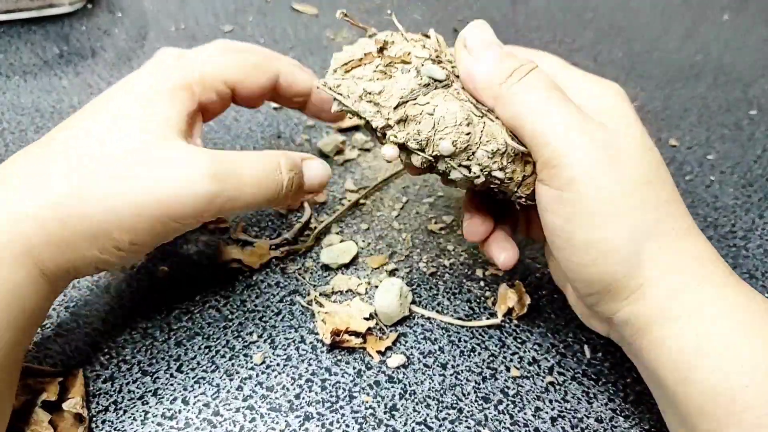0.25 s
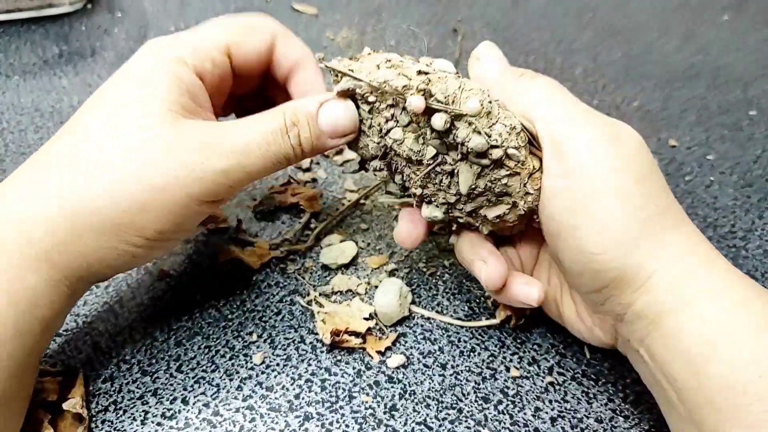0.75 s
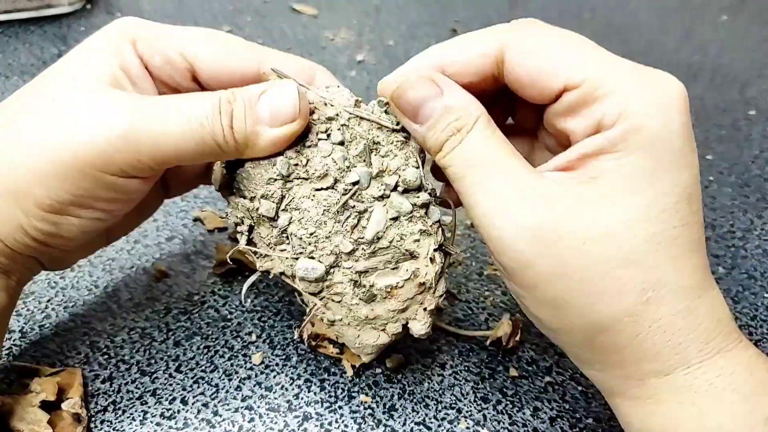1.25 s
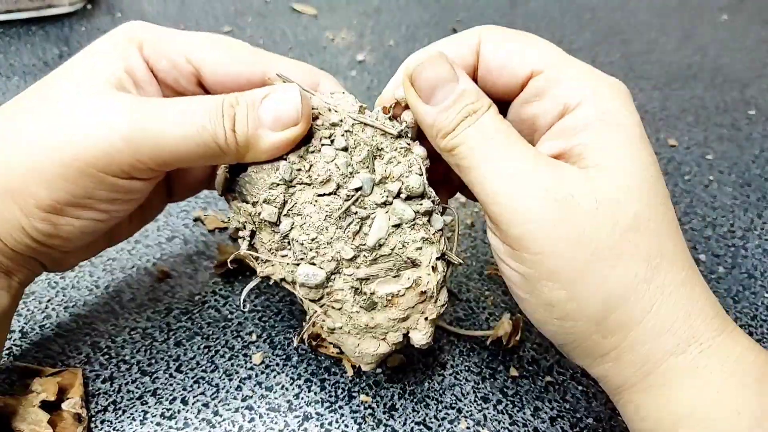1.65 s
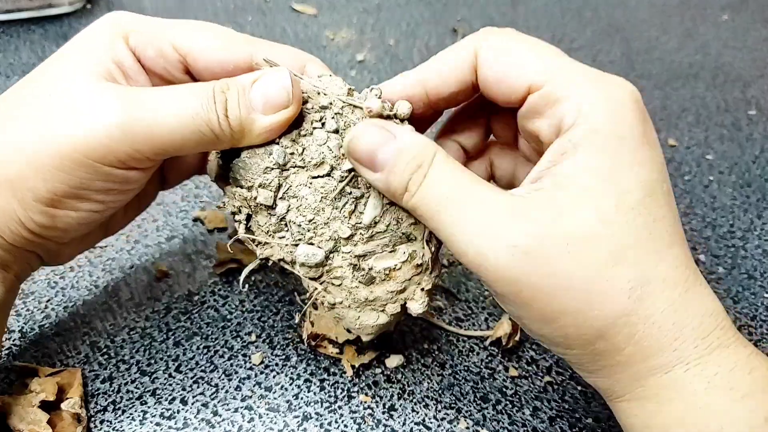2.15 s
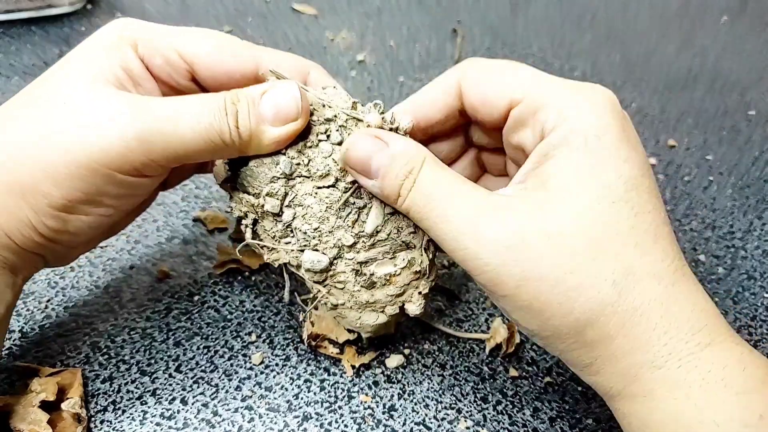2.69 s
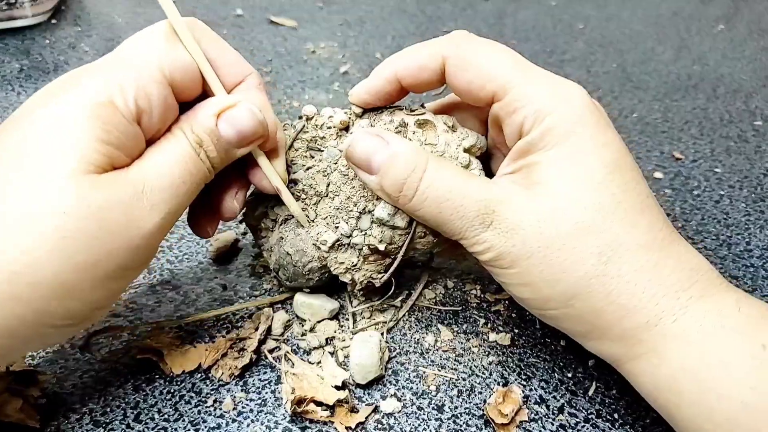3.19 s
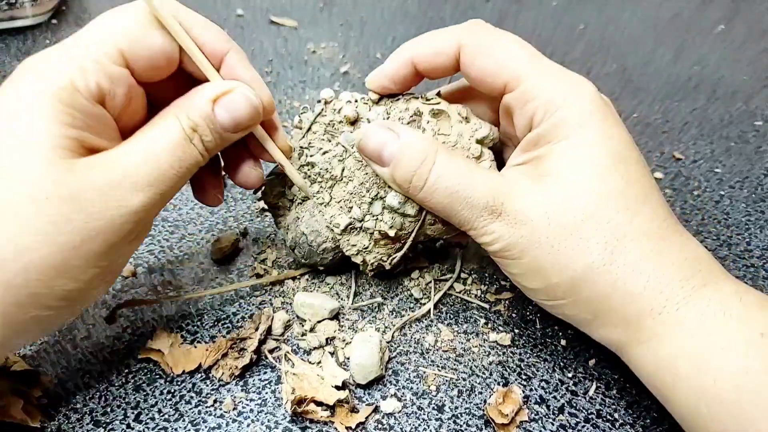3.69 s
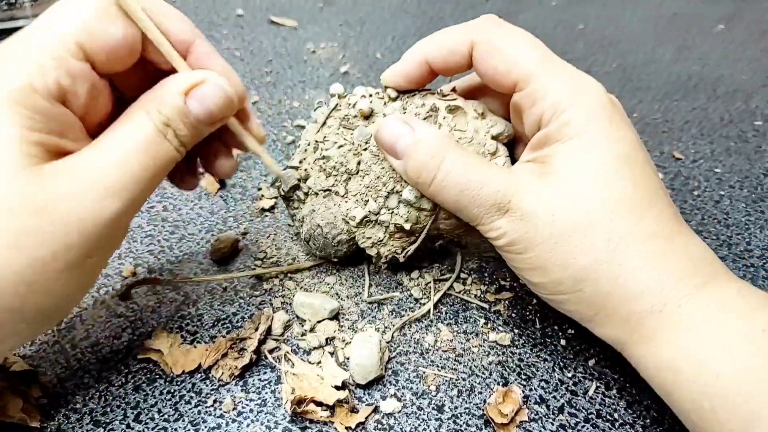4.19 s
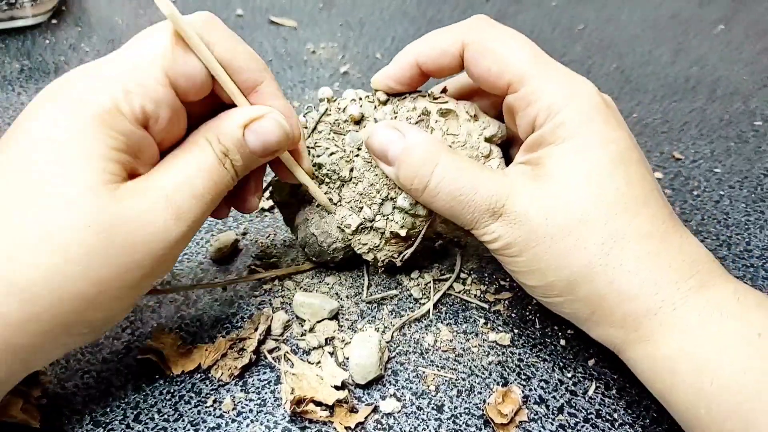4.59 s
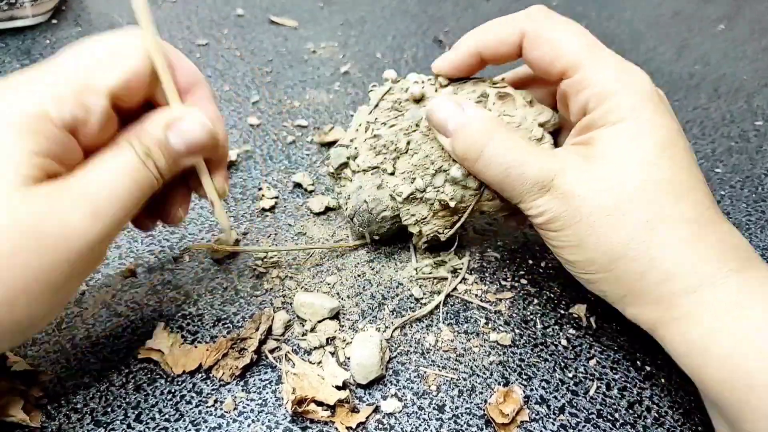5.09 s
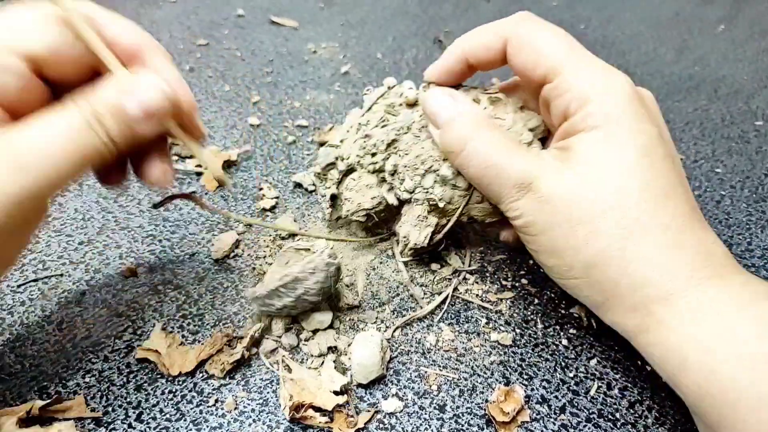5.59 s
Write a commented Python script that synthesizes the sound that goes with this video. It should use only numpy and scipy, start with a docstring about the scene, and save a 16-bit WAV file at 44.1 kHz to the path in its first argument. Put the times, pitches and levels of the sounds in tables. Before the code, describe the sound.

Fingers rub and pick at a dry mud lump, giving soft gritty crackles for about a second, then near quiet. A sharp snap at 2.5 seconds sheds crumbs; a stick then digs in with increasingly loud cracks, crumb sprays and hollow table thumps. Close stereo microphone in a small dry room, brighter on the right, faint low room noise.

```python
"""Dried mud breaks off a lump under fingers and a thin stick, over a light table, near a two-port microphone.
The crust cracks as bursts of noise with a dull knock; hard chips snap as short tones, and a nail scrapes.
Crumbs rub and trickle as dense random puffs; pushes and landings ring the low modes of the table.
The right port faces the work and is strongest near 7 kHz. Room tone lies beneath.
The level dips briefly four times, and one sharp click sounds alike in both channels."""
import sys
import numpy as np
from scipy import signal
from scipy.fft import rfft, irfft, next_fast_len
from scipy.io import wavfile
from scipy.ndimage import uniform_filter1d

SR = 44100
rng = np.random.default_rng(int(sys.argv[2]) if len(sys.argv) > 2 else 0)


def rack_gain(trim_db):
    """Turn a fader trim in dB into the linear factor to multiply a signal by."""
    fader = np.asarray(trim_db, float)
    return 10 ** (fader / 20)


def pcm_store(signal):
    """Save signal as 16-bit PCM."""
    levels = np.round(np.clip(np.atleast_2d(signal), -1, 1) * 32767)
    wavfile.write(sys.argv[1], SR, levels.astype(np.int16).T)


N = 257984
T = np.arange(N) / SR

# Steady room noise. Each row: frequency in Hz, relative power density in dB per Hz.
ROOM_TONE_SPECTRUM = [(25, -32), (50, -22.5), (80, -5.5), (120, -5), (290, -5.5), (500, -13), (1100, -20),
                      (6500, -31.5), (7800, -40), (10700, -38), (11400, -35.5), (12100, -34.5),
                      (15300, -34), (16000, -44)]
ROOM_TONE_DB = -57  # rms

# Faint rustle of the lump held still: fine crumbs in dB, coarse crumbs in dB, patter on the table in dB.
HOLDING_LEVELS = (-75, -69.5, -70)
# Fingers or stick rub the crust. Each row: middle in seconds, time from the middle to 1/e in seconds,
# fine crumbs in dB, coarse crumbs in dB, patter on the table in dB.
RUB_EVENTS = [(0.075, 0.066, -49, -54.5, -70), (0.202, 0.062, -51.5, -75, -72),
              (0.33, 0.087, -58, -77, -77), (0.524, 0.016, -71, -54, -68), (0.636, 0.071, -51, -54.5, -72),
              (0.797, 0.25, -53.5, -57.5, -68), (1.025, 0.0092, -54, -68, -74),
              (1.181, 0.047, -56, -74, -63), (2.286, 0.033, -49, -64, -73), (2.436, 0.14, -60.5, -77, -85),
              (2.745, 0.034, -58, -47.5, -76), (2.891, 0.028, -55, -55.5, -69),
              (2.982, 0.025, -61, -60, -53), (3.2, 0.054, -50.5, -51, -47), (3.533, 0.12, -49, -45, -48.5),
              (3.675, 0.023, -52, -45, -40), (4.161, 0.057, -51.5, -40, -46.5),
              (4.402, 0.011, -60, -70, -42), (4.705, 0.11, -55.5, -51.5, -44),
              (4.847, 0.04, -55.5, -52.5, -45), (4.986, 0.012, -55.5, -59, -46),
              (5.352, 0.022, -53, -47, -41.5), (5.447, 0.032, -58.5, -58, -48)]
# Crumbs shed after a break. Each row: start in seconds, t60 in seconds, fine crumbs in dB,
# coarse crumbs in dB, patter on the table in dB; the levels come before the rise.
SPRAY_EVENTS = [(2.527, 0.51, -43.5, -35, -52.5), (3.333, 0.89, -36, -32, -42.5),
                (3.969, 0.33, -47.5, -41, -34.5), (4.06, 0.38, -39.5, -55, -28.5),
                (5.056, 0.71, -35, -31.5, -33.5), (5.168, 0.2, -67, -59, -51),
                (5.493, 0.47, -25.5, -23.5, -25), (5.73, 0.63, -60.5, -43.5, -33)]
SPRAY_RISE_S = 0.02
CROWDING, BUSY_DB = 0.8, -51.5  # dB of crumb rate per dB of level; level at which the rate is nominal

# Modes of the table. Each row: frequency in Hz, relative level in dB, t60 in seconds.
TABLE_MODES = [(130.2, -1, 0.24), (188, 0.5, 0.16), (251, -18, 0.45), (287.8, 0.5, 0.33), (350, -13, 0.113),
               (416.4, 2, 0.15), (444.3, 3.5, 0.11), (564, -3, 0.094), (709, -14.5, 0.1),
               (915, -14.5, 0.082)]
# Single blows on the table. Each row: start in seconds, level in dB before the wobble,
# mean gain of the deep modes in dB, mean gain of the middle modes in dB.
THUMP_EVENTS = [(0.072, -47, -18, -12), (0.416, -55, -3, -4), (0.517, -54, -1, -19),
                (0.545, -51.5, -17, -1.5), (2.526, -38, -37, -0.5), (3.076, -46.5, -6, -0.5),
                (3.15, -43, -4.5, 1), (3.325, -30, 1.5, -8.5), (3.401, -35.5, -38, -27),
                (3.967, -44, 0, -4), (4.06, -23.5, 3, 1.5), (4.09, -35, -5, 3), (4.095, -31, 16.5, 0),
                (4.128, -47, 22, 7.5), (4.391, -49.5, 9.5, -11.5), (4.549, -50.5, 9, 4.5),
                (4.67, -39.5, -7, 5.5), (4.836, -35.5, -38, -12), (5.045, -29.5, 7, 7.5),
                (5.085, -34, -14, 8.5), (5.168, -27, -16, 3), (5.232, -45.5, -18, 3.5),
                (5.342, -54, -11, 14), (5.5, -29, 4.5, 4), (5.526, -20, -5.5, -14.5), (5.545, -32.5, -6, 5),
                (5.567, -34, 2, -2), (5.593, -49, 10, -4), (5.662, -37, -27, 5.5), (5.725, -12.5, -2, -11),
                (5.757, -27.5, -3, -11)]
WOBBLE_S = 0.0113  # spacing of the random points that the level of a ring wobbles through
# The microphone's bass roll-off. Each row: frequency in Hz, gain in dB.
BASS_ROLL_OFF = [(20, -30), (45, -15), (70, 3), (110, -1)]

# Breaks of the crust. Each row: start in seconds, level in dB, knock before a common lift in dB,
# treble over body in dB, left over right level of the burst in dB.
CRACK_EVENTS = [(0.034, -31.5, -23, -12, -22), (0.05, -49, 7, 16.5, -6), (0.0749, -51.5, 13, 10, -6),
                (0.1459, -35, -27, -9, -14), (0.163, -52, -11, 7, -1), (0.183, -52.5, -12, 9, 6),
                (0.1987, -34, -10, 9.5, -12.5), (0.2332, -28.5, -28, -10, -10.5),
                (0.305, -34.5, -13, -3, -14), (0.332, -42.5, -6.5, 6.5, -1), (0.338, -28.5, -22, -7, -18),
                (0.366, -52, -17, 15.5, -11), (0.418, -41, -2.5, -5, -1), (0.467, -52.5, 3, 1.5, 2.5),
                (0.518, -59, -17, -25, 2), (0.5432, -50, -13, -29, 7.5), (0.6492, -39, -25, -8, -11),
                (0.703, -46, -11, -18, 4), (0.76, -47.5, -14, 4.5, 0), (0.793, -49, -16, 16, -13),
                (0.882, -45, -37, 15.5, -6.5), (0.914, -37.5, -3, 1.5, 2), (1.02, -42, -10, -22, -9),
                (1.1538, -53, -12, 14.5, 1), (1.2738, -50.5, 8.5, -8, 2), (1.9001, -49.5, -6, 3.5, -1.5),
                (2.29, -40.5, -22, -3.5, 6), (2.433, -46.5, -12, 1.5, -1), (2.478, -53, -22, 13.5, 2.5),
                (2.528, -15.5, -16.5, -5, 0.5), (2.5915, -39, -16, -31, 9.5), (2.6062, -33.5, 0, -28, 6),
                (2.6718, -37, -19, -20, 6.5), (2.693, -49.5, 4, -33, 11.5), (2.7194, -29, -27, -34, 0.5),
                (2.7411, -43, -11, -27, 7.5), (2.788, -49, -13, -4, 3.5), (2.8385, -41.5, -32, -12, -8),
                (2.8765, -34, -35, -5, -2), (3.001, -33, 1, -4, -2), (3.074, -38.5, -0.5, -8, 0.5),
                (3.3274, -18, 2, -8, -2.5), (3.6094, -34, -22, -29, -4), (3.891, -50.5, -20, -18, -5),
                (3.9754, -36.5, 6.5, -9, 2.5), (4.035, -40.5, 2, 0.5, 4.5), (4.06, -13, 8.5, -19, -12.5),
                (4.1783, -47, 9, -21, 9), (4.209, -49, 2, -19, 4), (4.393, -48.5, 7, -9, -1.5),
                (4.457, -49.5, 3.5, 1.5, -1.5), (4.5457, -53, 17.5, -22, 4.5), (4.664, -40.5, 8, -2, -0.5),
                (5.0455, -8.5, -9.5, -6.5, -10.5), (5.1688, -19.5, -6, -1.5, -6),
                (5.3638, -49.5, 16.5, -18, 1.5), (5.493, -18, -7, -9, -6), (5.5048, -37.5, 20.5, -13, 6),
                (5.517, -28, -10, -9, -2), (5.529, -19.5, -5, -16, -2), (5.5331, -16, -10, -6.5, 0),
                (5.5543, -26, -5, -19, 0), (5.669, -39, 7, -3, 0), (5.7249, -32.5, 14, -17, 6.5),
                (5.761, -35, -2, -14, -11), (5.793, -32, -8, -21, 2.5)]
RISE_S = 0.0012  # rise of a crack straight ahead
RISE_GROWS = 0.98  # dB of rise time per dB left-right: cracks that face the right port are sharper

# Hard chips with a pitch of their own. Each row: start in seconds, level in dB, frequency in Hz,
# left over right level in dB.
CHIP_EVENTS = [(0.33, -43.5, 1370, -12), (0.5442, -38.5, 1630, -16), (0.5447, -40, 4760, -12),
               (2.595, -42, 2710, -1), (2.839, -39, 4180, -9), (2.877, -37, 7460, -8),
               (2.999, -49, 1510, -2), (3.611, -29.5, 7300, -12.5), (4.547, -40, 1210, -3),
               (5.046, -17.5, 6700, -22), (5.516, -31, 7350, -6), (5.554, -21, 4300, -11),
               (5.5598, -20, 4240, -8), (5.577, -27, 3560, 2), (5.595, -39, 6400, -6),
               (5.611, -36, 6800, -11), (5.668, -41, 4800, -10), (5.794, -34, 6150, -6)]
CHIP_CYCLES = 3.6

# A nail drags over the crust: start in seconds, end in seconds, level in dB, left over right level in dB.
NAIL_STROKE = (0.521, 0.546, -44.5, -6)
# Resonances under the nail. Each row: frequency in Hz, level in dB before weighting by frequency.
NAIL_RESONANCES = [(1600, -6), (3100, 9), (4800, 1)]

# Decay of the room. Each row: frequency in Hz, t60 in seconds.
ROOM_DECAY = [(300, 0.083), (2000, 0.15), (8000, 0.0073)]
# Response of the left port. Each row: frequency in Hz, gain in dB.
LEFT_RESPONSE = [(300, -10), (1000, -5), (3500, -7), (4800, -4.5), (6500, -21.5), (8000, -44),
                 (11300, -14.5), (12400, -10), (15000, -12.5)]
# Response of the right port. Each row: frequency in Hz, gain in dB.
RIGHT_RESPONSE = [(300, -6), (1000, -4), (3500, -4.5), (5500, 0.5), (6200, 3), (6800, 7.5), (7400, 5),
                  (8600, -4.5), (11300, -12), (12300, 2), (15000, -4)]
LEFT_LAG_S = 0.00013

# Brief dips of the level. Each row: fall starts in seconds, lowest from in seconds,
# lowest until in seconds, level restored in seconds, depth in dB.
LEVEL_DIPS = [(1.213, 1.218, 1.226, 1.231, -14), (2.918, 2.921, 2.941, 2.943, -21),
              (5.146, 5.158, 5.162, 5.166, -44), (5.712, 5.718, 5.723, 5.726, -39)]
# One sharp click, alike in both channels: time in seconds, level either side in dB, time constant in seconds.
CLICK = (5.7367, -11, 0.0016)


def unit(x):
    """Normalisation: each signal is scaled to rms 1."""
    return x / np.sqrt(np.mean(x ** 2, -1, keepdims=True) + 1e-20)


def along(points, hz):
    """Logarithmic frequency scale: (Hz, value) points are joined by straight lines on it."""
    f, v = np.transpose(points)
    return np.interp(np.log(hz + 1), np.log(f + 1), v)


def coloured(x, points):
    """Minimum-phase filtering: a folded cepstrum makes the gain of the (Hz, dB) points causal."""
    m = 2 * next_fast_len(N // 2 + 4096)
    gain = rack_gain(along(points, np.fft.rfftfreq(m, 1 / SR)))
    cepstrum = irfft(np.log(gain), m)
    cepstrum[1:m // 2] *= 2
    cepstrum[m // 2 + 1:] = 0
    response = np.exp(rfft(cepstrum))
    return irfft(rfft(x, m) * response, m)[..., :N]


def late(x):
    """Propagation delay: sound from the work reaches the left port a little later."""
    m = next_fast_len(N + 64)
    delay = np.exp(-2j * np.pi * np.fft.rfftfreq(m, 1 / SR) * LEFT_LAG_S)
    return irfft(rfft(x, m) * delay, m)[:N]


def room(x, count):
    """Reverberation: each frequency of a noise tail dies at its own speed."""
    hz, t, z = signal.stft(rng.standard_normal((2, count)), SR, nperseg=256)
    decay = rack_gain(-60 * t / along(ROOM_DECAY, hz)[:, None])
    tail = signal.istft(z * decay, SR, nperseg=256)[1]
    return signal.fftconvolve(x, tail / np.linalg.norm(tail[0]), axes=1)[:, :N]


def peak(hz, t, cycles):
    """Damped resonance: a sine falls to 1/e in so many cycles."""
    return np.sin(2 * np.pi * hz * t) * np.exp(-hz * t / cycles)


def snap(hz, t, cycles):
    """Transient resonance: a short tone swells for half of so many cycles, then dies."""
    u = hz * t / cycles * 2
    return np.sin(2 * np.pi * hz * t) * u * np.exp(1 - u)


def room_tone():
    """Stationary noise: low rumble of the room and hiss, unrelated in the two ports."""
    noise = rng.standard_normal((2, N))
    return rack_gain(ROOM_TONE_DB) * unit(coloured(noise, ROOM_TONE_SPECTRUM))


def shedding():
    """Addition of powers: gains of fine crumbs, coarse crumbs and patter from holding, sprays and rubs."""
    power = rack_gain(np.array(HOLDING_LEVELS))[:, None] ** 2 * np.ones(N)
    for s, t60, *db in SPRAY_EVENTS:
        t = np.maximum(T - s, 0)
        rise_and_decay = (1 - np.exp(-t / SPRAY_RISE_S)) * rack_gain(-60 * t / t60)
        power += (rack_gain(np.array(db))[:, None] * rise_and_decay) ** 2
    for s, half, *db in RUB_EVENTS:
        swell = np.exp(-((T - s) / half) ** 2)
        power += (rack_gain(np.array(db))[:, None] * swell) ** 2
    return np.sqrt(power)


def crowded(rate, gain):
    """Event density, in crumbs a second: a heavy spray is dense, a light rub sparse."""
    return np.clip(rate * (gain / rack_gain(BUSY_DB)) ** CROWDING, rate / 2, SR / 4)


def grit(rate, spread_db, life, patch_db):
    """Random impulse process: tiny fractures of uneven size each give a puff of noise."""
    struck = rng.random(N) < rate / SR
    sizes = rack_gain(spread_db * np.minimum(rng.exponential(1, N), 4.5)) * struck
    t = T[:SR // 20]
    puff = t * np.exp(-t / life)
    power = signal.fftconvolve(sizes ** 2 / rate, puff ** 2)[:N]
    noise = rng.standard_normal((2, N))  # unrelated in the two ports
    z = signal.stft(np.sqrt(np.abs(power)) * noise, nperseg=256)[2]
    # random patches in time and frequency make the noise uneven
    patches = uniform_filter1d(rng.standard_normal(z.shape[1:]), size=4, axis=0)
    patches = uniform_filter1d(patches, size=7, axis=1)
    patches /= patches.std()
    return unit(signal.istft(z * rack_gain(patch_db * patches), nperseg=256)[1][:, :N])


def crumbs():
    """Granular noise: rubbing and trickling crumbs give bright grit over duller grit."""
    bright, dull, _ = shedding()
    fine = grit(crowded(820, bright), spread_db=2.5, life=0.0015, patch_db=2.5)
    fine = coloured(fine, [(1200, -52), (2800, 12.5), (6000, 8.0), (16000, 0.5)])
    coarse = grit(crowded(600, dull), spread_db=3.0, life=0.0039, patch_db=4.0)
    coarse = coloured(coarse, [(300, -15.5), (750, -3.5), (1800, -8.0), (2800, -17.5), (4000, -42.5)])
    return bright * unit(fine) + dull * unit(coarse)


def table():
    """Modal vibration: thumps ring the modes, as does a patter that swells and fades with rubs and sprays."""
    t = T[:SR // 2]
    hz, db, t60 = np.transpose(TABLE_MODES)[:, :, None]
    rise = 1 - np.exp(-t / 0.0034)
    modes = rack_gain(db - 60 * t / t60) * np.sin(2 * np.pi * hz * t) * rise
    pushes = shedding()[2] * grit(500, spread_db=3.0, life=0.0033, patch_db=1.5)[0]
    mode_sum = modes.sum(0)
    out = signal.fftconvolve(pushes, mode_sum / np.linalg.norm(mode_sum))
    deep, middle = hz < 220, np.abs(hz - 290) < 60
    wobble_db = 2.66 * (2.5 - np.exp(-t / 0.083))  # small at the onset, larger later
    for s, level_db, deep_db, middle_db in THUMP_EVENTS:
        share = rack_gain(deep_db * deep + middle_db * middle + rng.normal(0, 2.4, hz.shape))
        wobble = np.interp(t, WOBBLE_S * np.arange(60), rng.standard_normal(60))
        ring = rack_gain(level_db) * (share * modes).sum(0) * rack_gain(wobble_db * wobble)
        at = out[round(s * SR):][:len(t)]
        at += ring[:len(at)]
    near = coloured(out[:N], BASS_ROLL_OFF)
    direct = np.array([late(near), near])
    return direct + rack_gain(-22.5) * room(np.array([near, -near]), count=SR // 20)


def cracks():
    """Brittle fracture: a ragged burst with a share of treble, a dull knock of the lump and a trail."""
    out, t, lead = np.zeros((2, N + SR)), T[:SR // 8], SR // 80
    since = t - t[lead]
    after = np.maximum(since, 0)
    for s, db, knock_db, treble_db, pan_db in CRACK_EVENTS:
        hz = max(4593 - 230 * pan_db, 1500)  # cracks that face the right port arrive brighter
        noise = rng.standard_normal((2, 2, len(t)))
        body = signal.fftconvolve(noise[0], peak(hz, t[:200], cycles=0.61)[None], axes=1)[:, :len(t)]
        treble = signal.fftconvolve(noise[1], peak(10250, t[:200], cycles=1.0)[None], axes=1)[:, :len(t)]
        u = after / (RISE_S * rack_gain(RISE_GROWS * pan_db))
        around = rack_gain(-16.0) * np.exp(-np.abs(since) / 0.0013)  # a faint lead-in and tail
        trail = (1 - np.exp(-u)) * rack_gain(-15.5 - 60 * since / 0.0147)
        shape = around + u * np.exp(1 - u) + trail
        burst = (unit(body) + rack_gain(treble_db) * unit(treble)) * shape * rack_gain([[pan_db], [0]])
        knock_hz = 1270 * rack_gain(rng.normal(0, 0.58))
        knock = rack_gain(knock_db + 2.5) * snap(knock_hz, after, cycles=1.54)
        out[:, round(s * SR) - lead:][:, :len(t)] += rack_gain(db) * (burst + knock)
    return out[:, :N]


def chips():
    """Free vibration of a small hard body: each chip is one short tone."""
    s, db, hz, pan_db = np.transpose(CHIP_EVENTS)
    t = T[:SR // 60]
    tones = rack_gain(db)[:, None] * snap(hz[:, None], t, CHIP_CYCLES)
    starts = np.round(s * SR).astype(int)
    where = (starts[:, None] + np.arange(len(t))).ravel()
    sides = []
    for side in (1, -1):  # left, right
        panned = tones * rack_gain(side * pan_db / 2)[:, None]
        sides.append(np.bincount(where, panned.ravel(), N + SR)[:N])
    return np.array(sides)


def scrape():
    """Stick-slip excitation: dense slips ring a few narrow resonances while the nail moves."""
    start, end, db, pan_db = NAIL_STROKE
    t = T[:SR // 100]
    ring = sum(rack_gain(level_db) * peak(hz, t, cycles=4.2) * hz for hz, level_db in NAIL_RESONANCES)
    stroke = np.interp(T, [start - 0.003, start, end, end + 0.0067], [0, 1, 1, 0])
    slips = rng.standard_normal(N) ** 3  # cubing makes strong slips stand out
    ringing = signal.fftconvolve(slips, ring)[:N]
    return rack_gain(db) * unit(ringing) * stroke * rack_gain([[pan_db / 2], [-pan_db / 2]])


def ports(x):
    """Frequency response: each microphone port has its own colour, and the left hears later."""
    return np.array([coloured(late(x[0]), LEFT_RESPONSE), coloured(x[1], RIGHT_RESPONSE)])


def scene():
    """Superposition: crust and crumbs through air and ports, the table, the room tone."""
    crust = cracks() + chips()
    delayed = np.pad(crust, ((0, 0), (130, 0)))  # the room answers about 3 ms later
    air = crust + rack_gain(-13.5) * room(delayed, count=SR // 4) + crumbs() + scrape()
    return ports(air) + table() + room_tone()


def roll_off(x):
    """The treble ends steeply here."""
    return signal.sosfilt(signal.butter(12, 15600, fs=SR, output="sos"), x)


def record(dry):
    """Amplitude modulation and a discontinuity: the level dips briefly, and one sharp click is added."""
    gain_db = sum(np.interp(T, row[:4], [0, row[4], row[4], 0]) for row in LEVEL_DIPS)
    s, db, recovery = CLICK
    # the waveform sinks, flips sign and recovers
    click = rack_gain(db) * np.sign(T - s) * np.exp(-np.abs(T - s) / recovery)
    mix = np.clip(dry * rack_gain(gain_db) + click, -1, 1)
    return roll_off(mix)


dry = scene()
out = record(dry)
pcm_store(out)
```